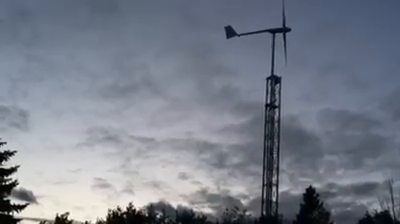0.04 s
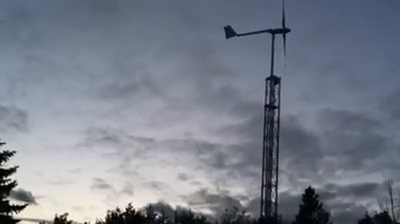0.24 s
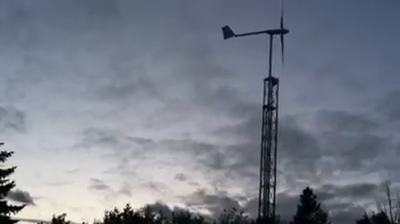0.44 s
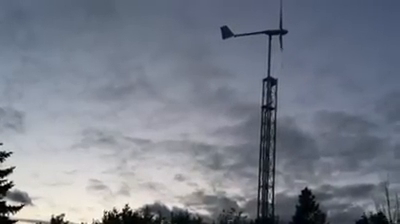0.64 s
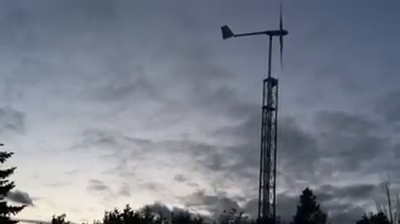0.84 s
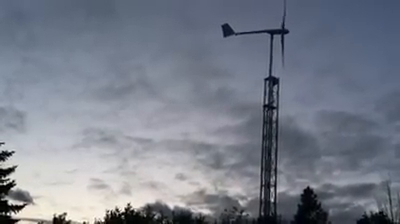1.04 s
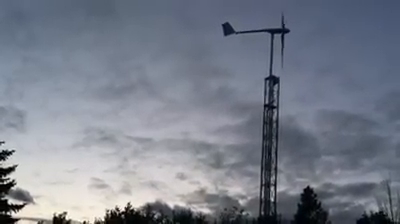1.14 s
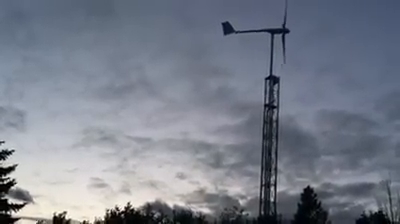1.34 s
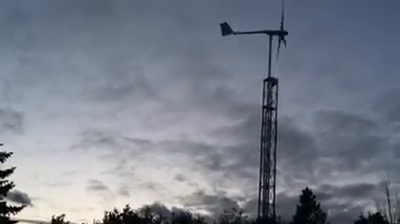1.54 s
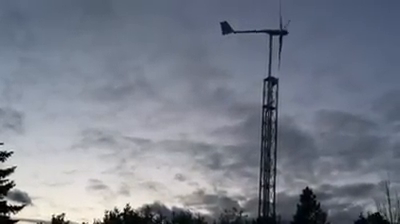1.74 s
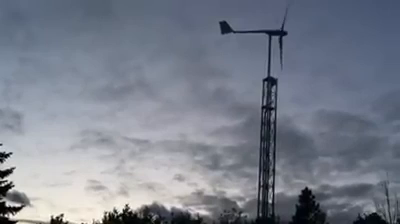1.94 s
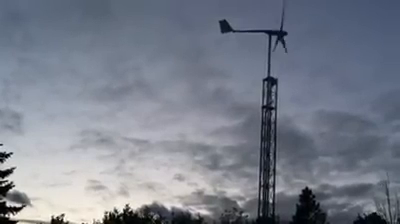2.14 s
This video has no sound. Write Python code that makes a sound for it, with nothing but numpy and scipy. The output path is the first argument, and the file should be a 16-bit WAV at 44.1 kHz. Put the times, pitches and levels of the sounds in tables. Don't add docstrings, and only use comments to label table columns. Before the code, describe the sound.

Wind gusts thump and rumble low on a microphone outdoors, over a very faint turbine swish

```python
import sys
import numpy as np
from scipy import signal
from scipy.fft import rfft, irfft
from scipy.io import wavfile
from scipy.ndimage import uniform_filter1d

SR = 44100
rng = np.random.default_rng(int(sys.argv[2]) if len(sys.argv) > 2 else 0)


def boost_factor(decibels):
    exponent = np.asarray(decibels, float) / 20
    return 10 ** exponent


def materialize(psi):
    bounded = np.clip(np.atleast_2d(psi).T, -1, 1)
    quanta = np.round(bounded * 32767).astype(np.int16)
    wavfile.write(sys.argv[1], SR, quanta)


N = 97020


def rms_one(x):
    return x / np.sqrt(np.mean(x ** 2) + 1e-20)


def in_time(rows):
    time_s, value = np.transpose(rows)
    return np.interp(np.arange(N) / SR, time_s, value)


def resonate(noise, pole):
    return signal.lfilter([1], [1, -2 * pole, pole * pole], noise)


def drift(rate_hz):
    pole = np.exp(-80 * np.pi * rate_hz / SR)
    slow = resonate(rng.standard_normal(N // 40 + 2002), pole)[2000:]
    return np.interp(np.arange(N) / 40, np.arange(len(slow)), rms_one(slow))


def banded_noise(spectrum, patchy_db):
    hz = np.maximum(np.arange(N // 2 + 1) * SR / N, 1)
    point_hz, point_db = np.transpose(spectrum)
    colour_db = np.interp(np.log(hz), np.log(point_hz), point_db, -90, -90)
    colour = rfft(rng.standard_normal(N)) * boost_factor(colour_db)
    together = drift(4.5)
    out = 0
    for centre_hz in 32 * 2 ** np.arange(0, 9.1, 1 / 3):
        band = np.clip(1 - 3 * abs(np.log2(hz / centre_hz)), 0, 1)
        flicker_db = patchy_db * (0.2 * together + drift(7.3))
        out = out + irfft(colour * band, N) * boost_factor(flicker_db)
    return rms_one(out)


# (frequency [Hz], density [dB/Hz])
HISS_SPECTRUM = [(2200, -5), (3200, -3), (4940, -1.5), (7930, -7.5), (9330, -7.5), (10800, -14),
                 (13000, -21.5), (15750, -23.5)]
HISS_DB = -75


def recorder_hiss():
    return boost_factor(HISS_DB) * banded_noise(HISS_SPECTRUM, patchy_db=0.18)


# (frequency [Hz], density [dB/Hz])
TREE_SPECTRUM = [(55, -43), (115, -11.5), (220, -3.5), (438, -11.5), (800, -9.5), (1300, -15),
                 (1950, -18.5), (2800, -31)]
TREES_DB = -65


def far_trees():
    return boost_factor(TREES_DB) * banded_noise(TREE_SPECTRUM, patchy_db=0.73)


# (time [s], speed [share of mean])
AIR_SPEED = [(0, 1.03), (.4, 1.01), (1.0, 1.01), (1.4, 1.01), (1.65, 1.0), (1.78, .98), (1.88, 1.1),
             (2.0, 1.02), (2.2, 1.01)]
# (time [s], level [dB])
SWISH_LEVEL = [(0, -66), (.2, -65.5), (.4, -72.5), (.55, -72.5), (.62, -69), (.72, -76), (.9, -66.5),
               (1.05, -70), (1.15, -71.5), (1.3, -66), (1.5, -67.5), (1.65, -62.5), (1.8, -64.5),
               (1.9, -70.5), (2.2, -68)]
# (frequency [Hz], width [Hz], level [dB])
BLADE_HUMPS = [
    (770, 103, -5),
    (890, 114, 0.5),
    (999, 130, -6),
    (1249, 490, -5.5),
]
SWISH_FLICKER_DB = 0.8


def blades():
    turns_per_hz = np.cumsum(in_time(AIR_SPEED)) / SR
    out = 0
    for hz, width_hz, db in BLADE_HUMPS:
        pole = np.exp(-np.pi * width_hz / SR)
        a, b = resonate(rng.standard_normal((2, N + 4000)), pole)[:, 4000:]
        phase = 2 * np.pi * hz * turns_per_hz
        hump = a * np.cos(phase) + b * np.sin(phase)
        out = out + rms_one(hump) * boost_factor(db + SWISH_FLICKER_DB * drift(4.3))
    return boost_factor(in_time(SWISH_LEVEL)) * rms_one(out)


# (time [s], level [dB])
GUST_LEVEL = [(0, -63), (.06, -59), (.13, -64), (.2, -58), (.27, -56), (.36, -61), (.42, -70), (.57, -65.5),
              (.62, -60), (.68, -76), (.76, -63), (.82, -58), (.93, -55), (1.07, -59), (1.11, -68),
              (1.22, -68), (1.27, -79), (2.2, -85)]
RUMBLE_DB, RUMBLE_LOW_HZ, RUMBLE_HIGH_HZ = -23.5, 25, 70


def rumble():
    band = signal.butter(2, [RUMBLE_LOW_HZ, RUMBLE_HIGH_HZ], "band", fs=SR, output="sos")
    noise = signal.sosfilt(band, rng.standard_normal(N))
    return boost_factor(in_time(GUST_LEVEL) + RUMBLE_DB) * rms_one(noise)


PORT_CUT_HZ = 113.7
EDDY_WIDTH_CYCLES, SHORTEST_CYCLES = 0.396, 0.284
BIG_ROLL_LONGER = 0.78
PITCH_SHARE = 0.897
EDDY_SAMPLES, EDDY_PEAK = 4096, 1024


def eddy(hz):
    cycles = (np.arange(EDDY_SAMPLES) - EDDY_PEAK) / SR * hz
    width_cycles = max(EDDY_WIDTH_CYCLES * (200 / hz) ** BIG_ROLL_LONGER, SHORTEST_CYCLES)
    swell = np.sin(2 * np.pi * cycles * PITCH_SHARE) * np.exp(-0.5 * (cycles / width_cycles) ** 2)
    bass_cut = signal.butter(4, PORT_CUT_HZ, "high", fs=SR, output="sos")
    rung = signal.sosfilt(bass_cut, swell)
    peak = abs(rung).argmax()
    return np.roll(rung, EDDY_PEAK - peak) / rung[peak]


SMALL_PER_S, SMALL_SPREAD_DB = 100, 2.5
SMALL_LOW_HZ, SMALL_HIGH_HZ = 104.6, 228.4


def turbulence(count=6):
    size_db = SMALL_SPREAD_DB * np.minimum(rng.exponential(1, N), 3)
    strikes = boost_factor(size_db) * rng.choice([-1, 1], N) * (rng.random(N) < SMALL_PER_S / SR)
    dealt = rng.integers(0, count, N)
    out = 0
    for k, hz in enumerate(np.geomspace(SMALL_LOW_HZ, SMALL_HIGH_HZ, count)):
        out = out + signal.fftconvolve(strikes * (dealt == k), eddy(hz))[:N]
    return boost_factor(in_time(GUST_LEVEL)) * rms_one(out)


# (time [s], peak level [dB], pitch [Hz])
PORT_RINGS = [
    (.2375, -50, 630),
    (.2365, -58, 830),
    (.8545, -56, 480),
]
RING_SPREAD_S = 0.0022


def port_rings():
    t = np.arange(N) / SR
    out = 0
    for time_s, db, hz in PORT_RINGS:
        envelope = np.exp(-0.5 * ((t - time_s) / RING_SPREAD_S) ** 2)
        out = out + boost_factor(db) * np.sin(2 * np.pi * hz * (t - time_s)) * envelope
    return out


# (time [s], peak level [dB], pitch [Hz])
EARLY_EDDIES = [(0.0452, -35, 155), (0.0807, -35, 164), (0.1588, -60.5, 178), (0.2191, -35, 189),
                (0.2279, -39.5, 166), (0.2359, -27, 285), (0.2406, -17.5, 240), (0.2493, -28, 177),
                (0.2844, -33.5, 233.7), (0.3247, -35.5, 225), (0.3461, -58, 136), (0.3583, -57, 203),
                (0.6195, -55, 152)]
# (time [s], peak level [dB], pitch [Hz])
LATER_EDDIES = [(0.7415, -52, 159), (0.7577, -46, 175), (0.7901, -43.5, 193), (0.8083, -37, 242),
                (0.8289, -42.5, 147), (0.8555, -29.5, 238), (0.882, -35.5, 145), (0.9082, -49.5, 193),
                (0.9199, -46, 227.4), (0.9436, -37.5, 174), (0.9791, -54, 170), (1.0003, -54, 169),
                (1.0291, -38.5, 268), (1.0547, -46.5, 184), (1.0631, -39, 192), (1.0731, -47.5, 149),
                (1.1123, -46.9, 206.5), (1.1435, -60, 158), (1.1726, -41.7, 150), (1.2043, -44.5, 143),
                (1.3712, -49.5, 147)]
EDDY_LAG_S, EDDY_DB = 0.0003, -1.0


def thumps():
    out = np.zeros(N + 2 * EDDY_SAMPLES)
    sign = 1
    for time_s, db, hz in list(EARLY_EDDIES) + list(LATER_EDDIES):
        start = int((time_s + EDDY_LAG_S) * SR)
        out[start:start + EDDY_SAMPLES] += sign * boost_factor(db + EDDY_DB) * eddy(hz)
        sign = -sign
    return out[EDDY_PEAK:N + EDDY_PEAK]


def scene():
    background = recorder_hiss() + far_trees() + blades()
    port_wind = rumble() + turbulence() + port_rings() + thumps()
    return (background + port_wind)[None]


SHARPEN_POWER, SHARPEN_FROM_HZ = 0.26, 1130


def sharpen_peaks(x):
    hz, _, cells = signal.stft(x, SR, nperseg=2048)
    size = abs(cells)
    mean = abs(uniform_filter1d(size, size=15, axis=0)) + 1e-10
    power = SHARPEN_POWER * np.clip(np.log2(hz / SHARPEN_FROM_HZ + 1e-9), 0, 1)[:, None]
    sharpened = cells * (size / mean + 1e-9) ** power
    return signal.istft(sharpened, SR, nperseg=2048)[1][:N]


def roll_off(x):
    return signal.sosfilt(signal.butter(12, 15630, fs=SR, output="sos"), x)


CONVERTER_OFFSET = -1e-4


def record(dry):
    mix = sharpen_peaks(dry[0])[None] + CONVERTER_OFFSET
    return roll_off(mix)


dry = scene()
out = record(dry)
materialize(out)
```